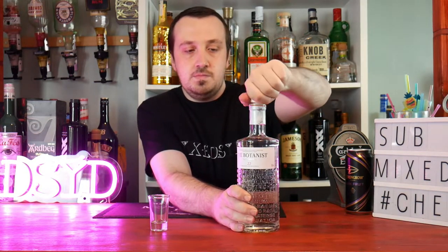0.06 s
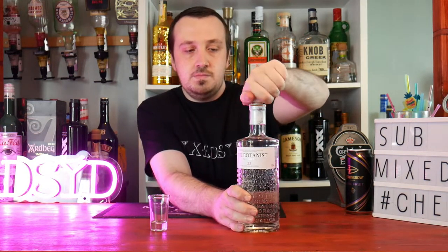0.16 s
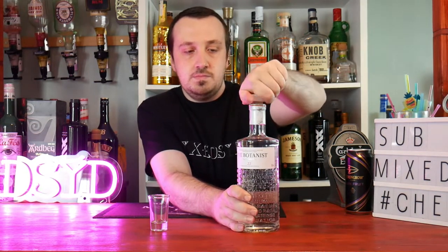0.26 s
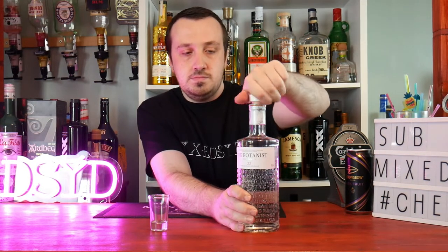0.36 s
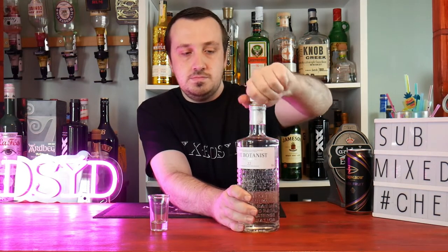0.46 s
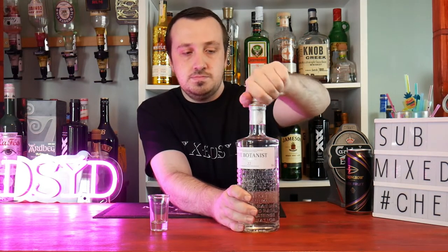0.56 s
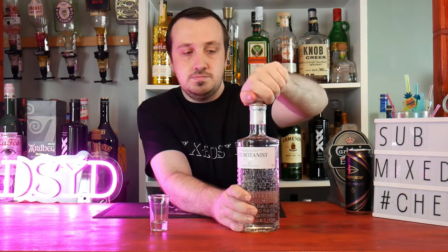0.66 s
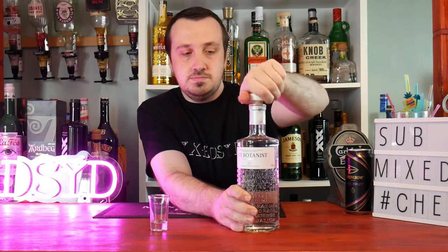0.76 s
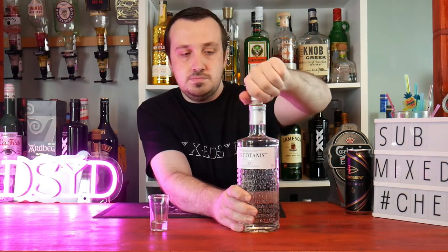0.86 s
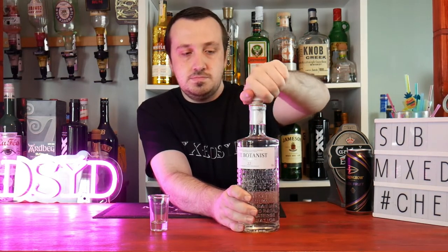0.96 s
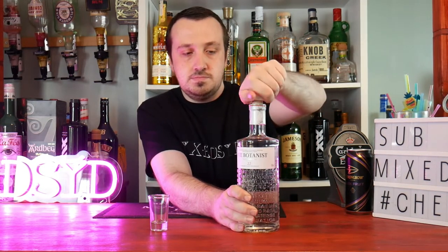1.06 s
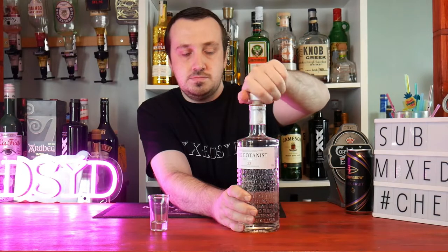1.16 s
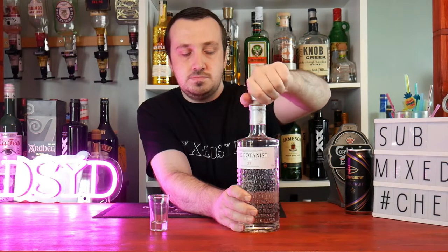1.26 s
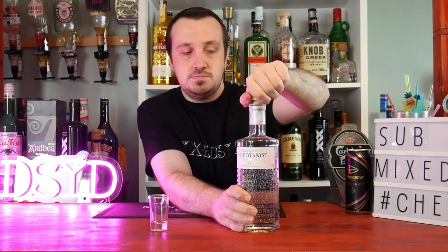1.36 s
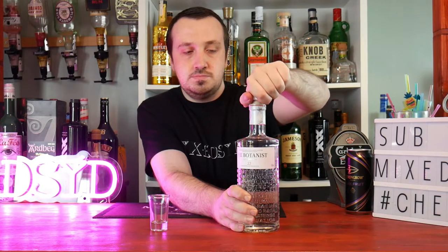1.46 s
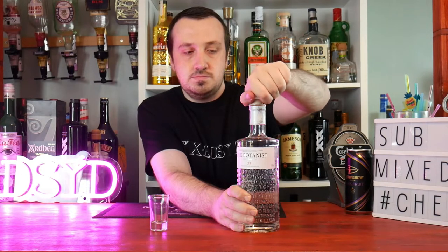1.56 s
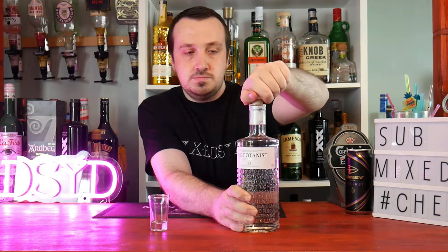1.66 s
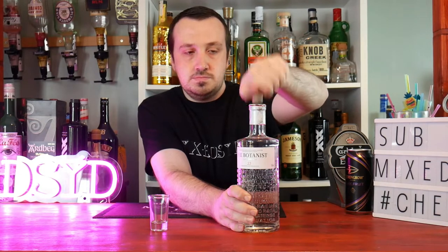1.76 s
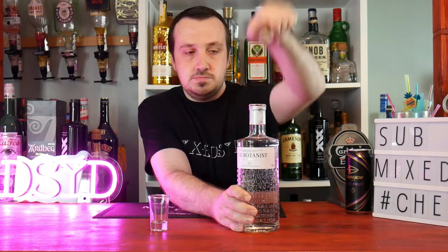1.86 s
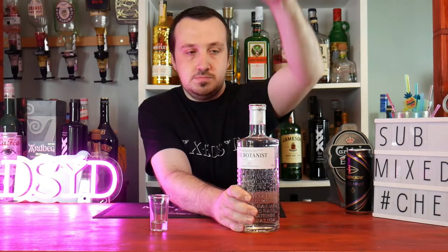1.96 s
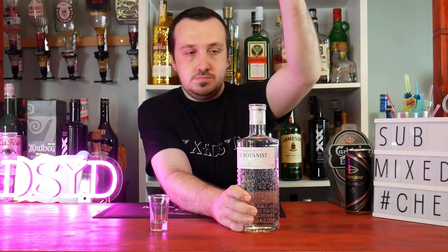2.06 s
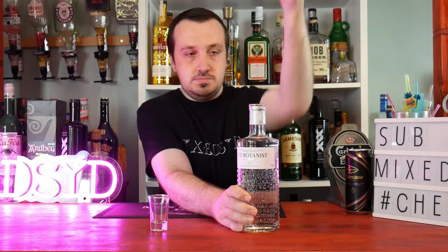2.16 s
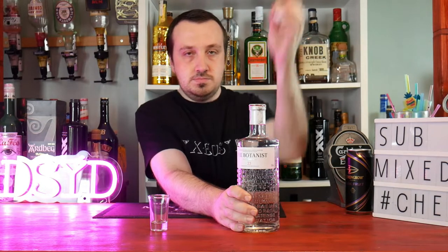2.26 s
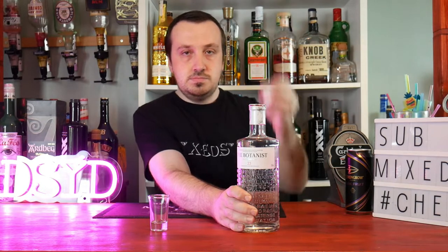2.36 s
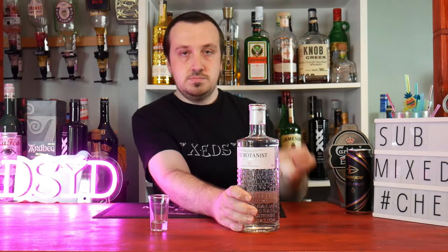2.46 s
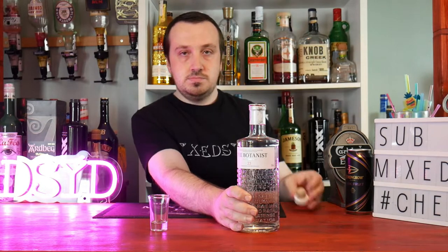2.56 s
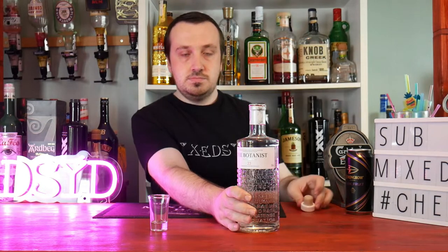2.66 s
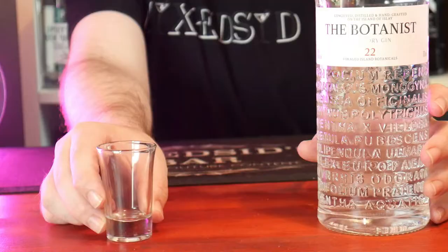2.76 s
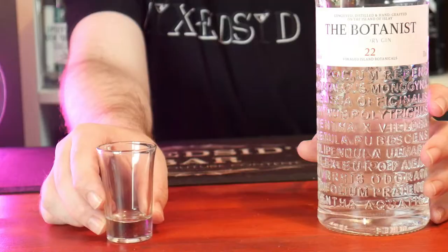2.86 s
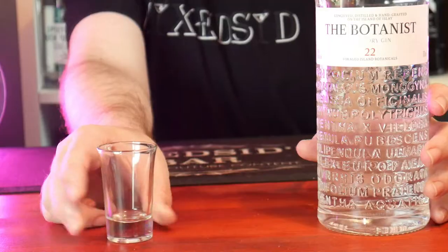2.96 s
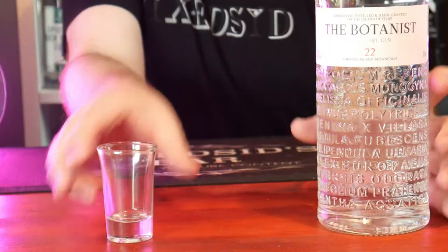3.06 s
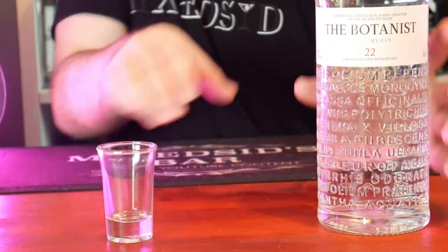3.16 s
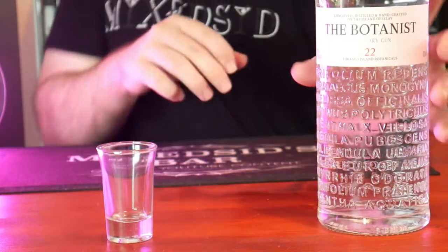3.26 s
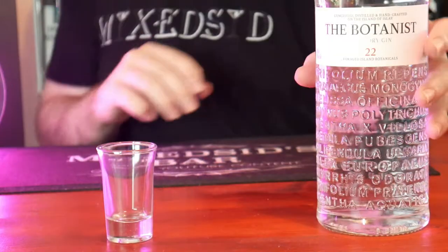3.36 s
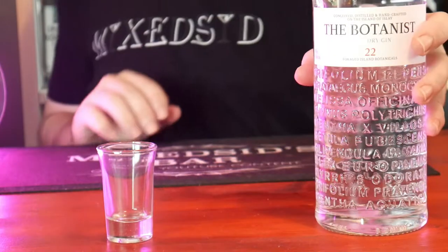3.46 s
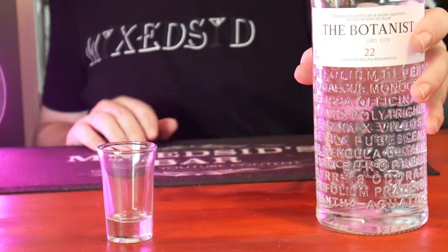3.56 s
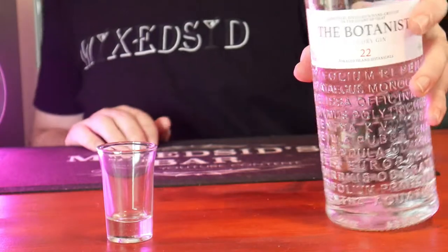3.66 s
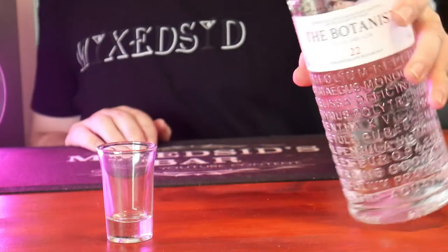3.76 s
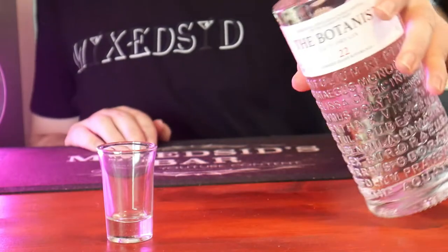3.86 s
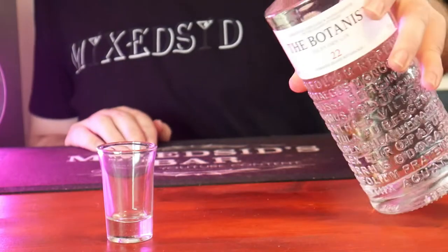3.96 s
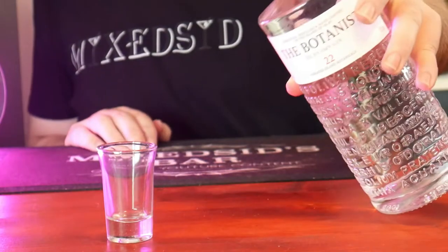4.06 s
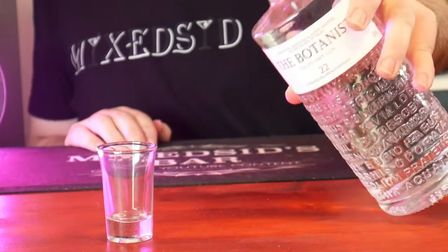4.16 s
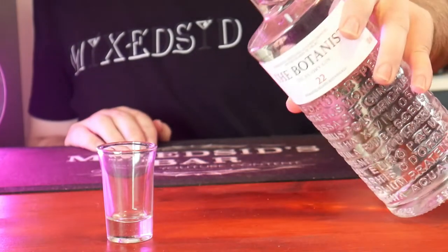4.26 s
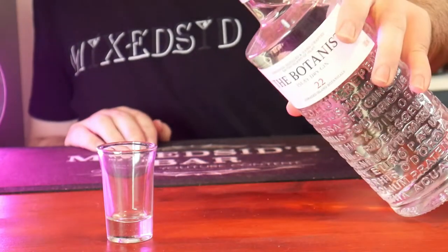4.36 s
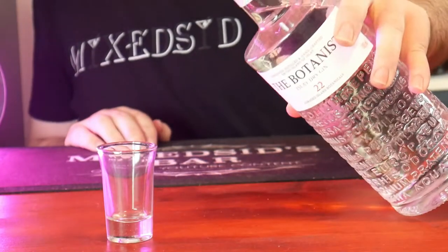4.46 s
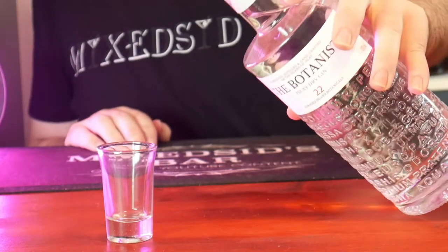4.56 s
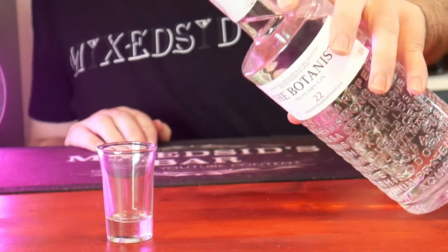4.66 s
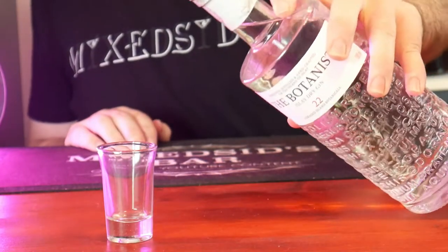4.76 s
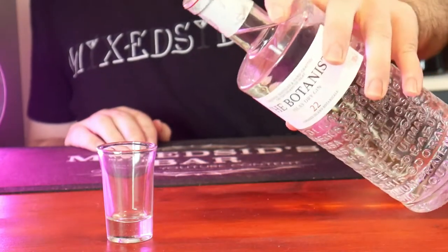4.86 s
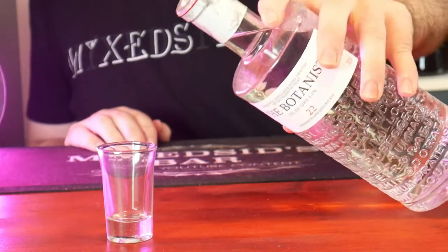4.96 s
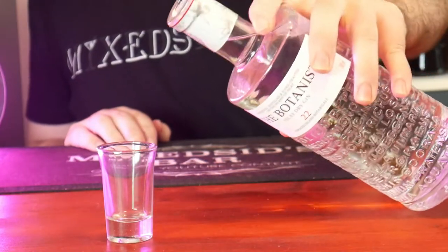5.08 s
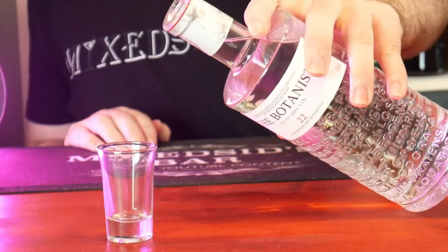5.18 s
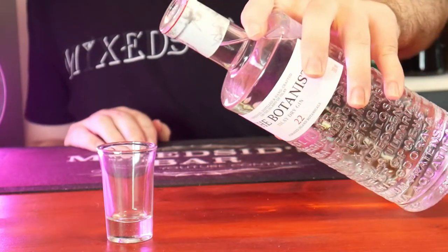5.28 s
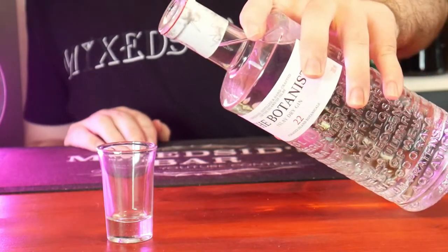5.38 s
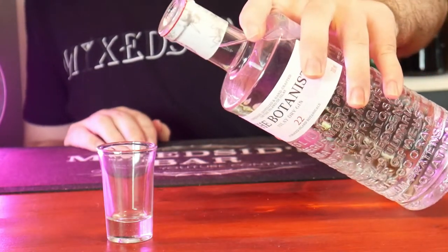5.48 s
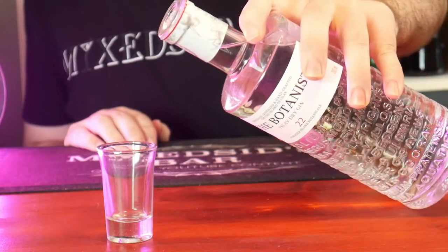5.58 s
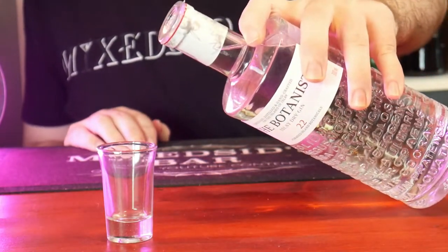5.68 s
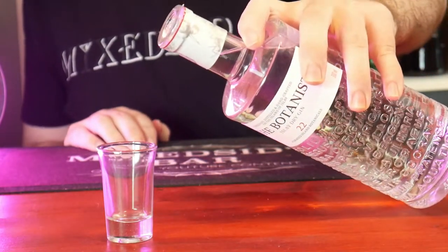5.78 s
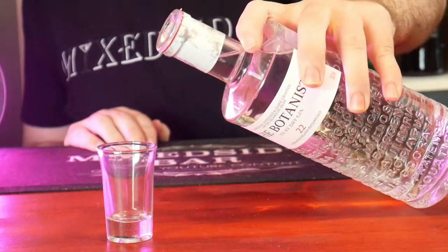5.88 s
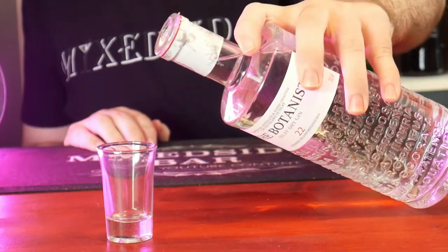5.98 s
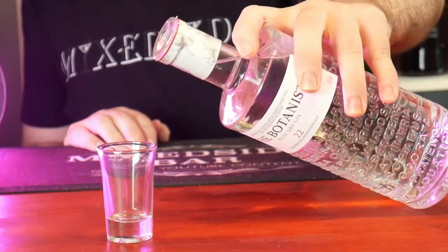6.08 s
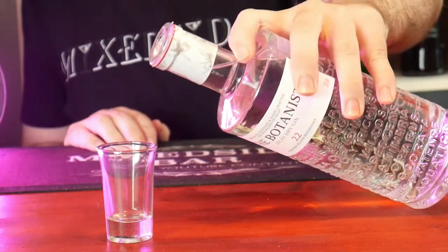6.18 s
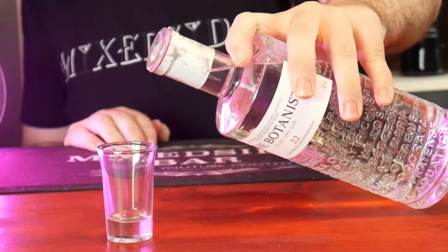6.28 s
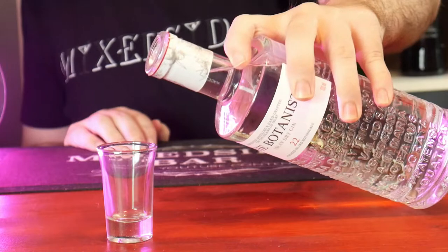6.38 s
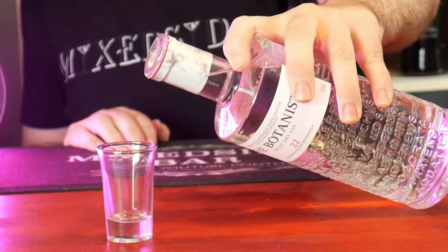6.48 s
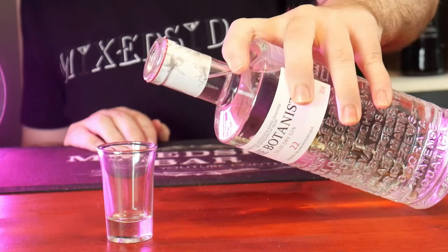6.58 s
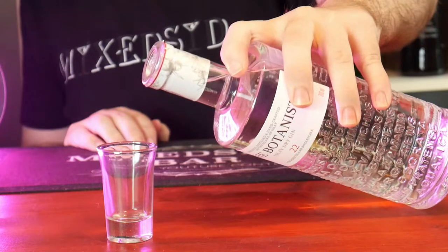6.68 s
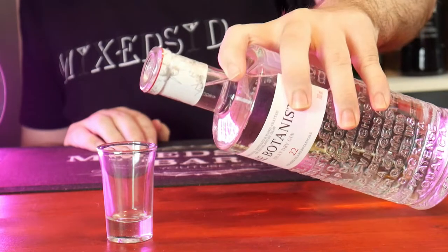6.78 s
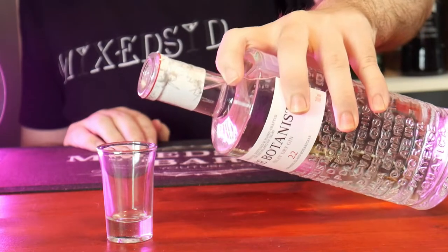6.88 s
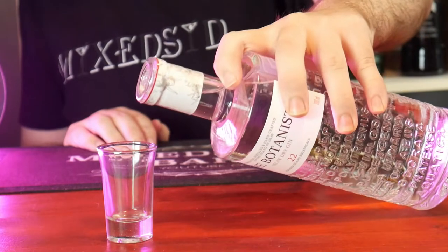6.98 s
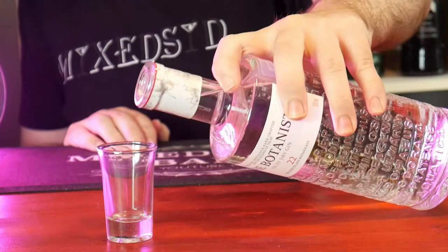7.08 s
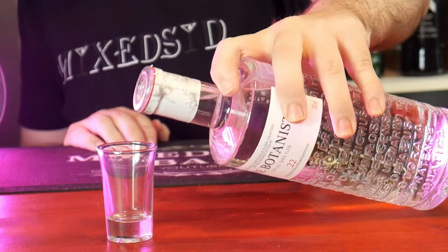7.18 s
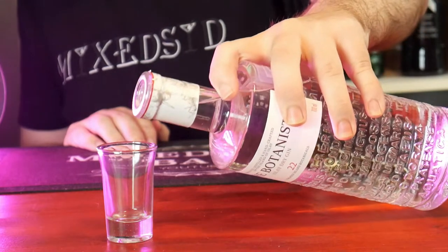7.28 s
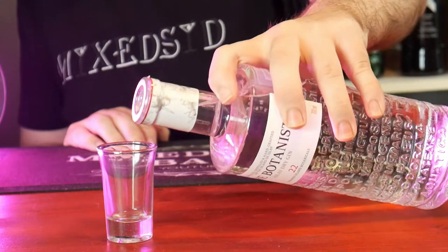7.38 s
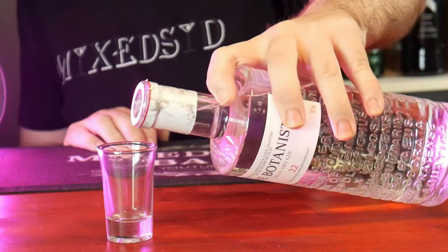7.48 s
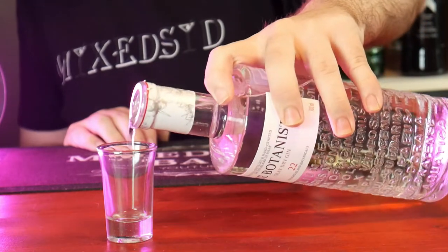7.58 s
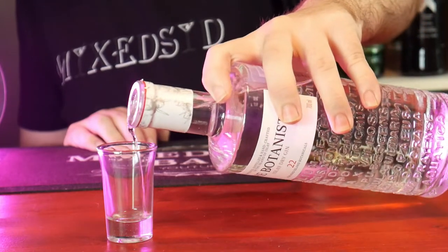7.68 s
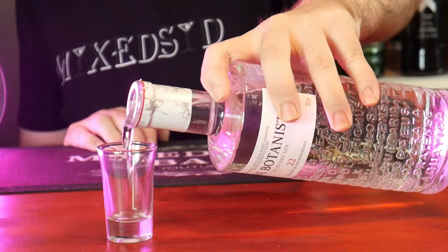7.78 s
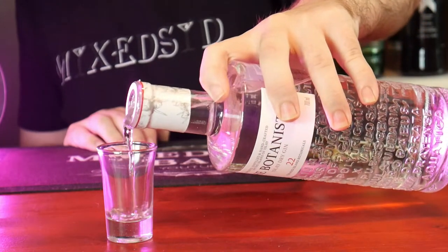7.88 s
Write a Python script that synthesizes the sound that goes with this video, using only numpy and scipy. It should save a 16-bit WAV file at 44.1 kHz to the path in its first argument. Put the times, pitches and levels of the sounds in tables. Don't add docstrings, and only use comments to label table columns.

```python
import sys
import numpy as np
from scipy import signal
from scipy.fft import rfft, irfft, next_fast_len
from scipy.io import wavfile
from scipy.ndimage import map_coordinates

SR = 44100
rng = np.random.default_rng(int(sys.argv[2]) if len(sys.argv) > 2 else 0)


def boost_factor(decibels):
    exponent = np.asarray(decibels, float) / 20
    return 10 ** exponent


def inscribe(sig):
    pcm = np.round(np.clip(np.atleast_2d(sig).T, -1, 1) * 32767)
    wavfile.write(sys.argv[1], SR, pcm.astype(np.int16))


N = 349713

# frequency in Hz, density in dB per Hz.
THUD = [(20, -23.5), (35, -9.5), (52, -3), (64, 1.5), (85, -4.5), (128, -2.5), (160, -12.5), (260, -43.5),
        (600, -100)]
# frequency in Hz, density in dB per Hz.
BODY = [(70, -37.5), (150, -4.5), (215, 2.5), (260, -3), (330, -8.5), (420, -26), (700, -51.5),
        (1500, -100)]
# frequency in Hz, density in dB per Hz.
KNOCK = [(150, -30.5), (350, 2), (600, -1.5), (1200, -7), (1900, -14.5), (2600, -20), (4000, -40)]
# frequency in Hz, density in dB per Hz.
RUSTLE = [(880, -30.5), (1500, -3.5), (1700, 0), (1840, -4.5), (2270, -1), (2810, -2.5), (3770, -0.5),
          (5480, -11.5), (12000, -17), (14800, -19), (15700, -26)]
# time in seconds, level in dB.
EDITS = [
    (0, 0),
    (2.7679, 0),
    (2.7681, -9),
    (2.984, -6),
    (2.986, 0),
]


def pop():
    # frequency in Hz, level in dB, t60 in seconds.
    neck_modes = [(625, -29.5, 0.22), (755, -29.5, 0.28), (808, -31.5, 0.39), (825.5, -33, 0.16)]
    # frequency in Hz, density in dB per Hz.
    rush = [(600, -29.5), (950, -13.5), (1400, -7), (2000, -8), (2420, -2), (2800, -7.5), (3400, 2.5),
            (4200, -12), (5200, -13), (8000, -15.5), (15700, -28)]
    # frequency in Hz, density in dB per Hz.
    scattered = [(250, -28.5), (400, -12.5), (600, -6), (760, 3.5), (845, -3.5), (885, -31), (1300, -62)]
    pop_s = 1.7795
    out = np.zeros(N)
    add(out, pop_s + 0.0005, neck())
    add(out, pop_s + 0.044, ring(neck_modes, attack_s=0.006, wander=0.008))
    add(out, pop_s + 0.008, boost_factor(-25.5) * burst(scattered, 1.1, rise_s=0.012, click=0))
    add(out, pop_s, boost_factor(-30.5) * burst(rush, 1.8, rise_s=0.0018, click=25.0))
    add(out, pop_s, boost_factor(-21.5) * burst(THUD, 0.73, rise_s=0.00416, click=21))
    add(out, pop_s, boost_factor(-25.5) * burst(BODY, 0.94, rise_s=0.003, click=6))
    return out


def neck():
    # start in seconds, hold in seconds, level in dB.
    swells = [
        (.004, .008, -13.5),
        (.0235, .0155, -16.5),
    ]
    open_hz, shut_hz, opening_s = 822, 100, 0.002
    settle_hz, settle_s = 190, 0.01
    t = np.arange(SR // 20) / SR
    gain = sum(boost_factor(db + swell(t, s, hold, attack=1800, release=3600)) for s, hold, db in swells)
    breaking = (open_hz - settle_hz - shut_hz) * np.exp(-t / opening_s)
    settling = settle_hz * np.exp(-t / settle_s)
    return glide(open_hz - breaking - settling, gain)


def cap():
    # frequency in Hz, density in dB per Hz.
    clack = [(40, -48), (130, -11.5), (240, -10), (400, -8.5), (740, -3.5), (1000, -5), (1300, -9),
             (1800, -16), (2300, -12.5), (3200, -22), (4300, -26.5), (5000, -38), (8000, -48.5),
             (15700, -68.5)]
    # frequency in Hz, level in dB, t60 in seconds.
    modes = [(603.5, -9.5, 0.29), (772, 2, 0.42), (870, -1, 0.48), (1016, -4, 0.36), (1248, 6.5, 0.13),
             (1335, 4, 0.098), (2244, -15, 0.55), (2580, -18.5, 0.39), (3122, -8, 0.16), (3800, -23, 0.65)]
    strike_s = 2.6569
    out = np.zeros(N)
    add(out, strike_s, boost_factor(-17.5) * burst(clack, 1.61, rise_s=0.00049, click=16))
    add(out, strike_s, boost_factor(-31.0) * ring(modes, attack_s=0.00032, wander=0.022))
    return out * (np.arange(N) < EDITS[1][0] * SR)


def drag():
    # centre in Hz, width in Hz, level in dB.
    resonances = [(211.4, 25, -2), (240, 30, 0), (520, 80, -29.5)]
    press_db = swell(np.arange(N) / SR, 3.6, 0.044, attack=800, release=236)
    slips = rng.standard_normal(N) * boost_factor(2.5 * wobble(90.3))

    def wood(hz):
        total = 0
        for k, (centre, width, db) in enumerate(resonances):
            damping = 1j * hz * width
            total = total + (-1) ** k * boost_factor(db) * damping / (centre ** 2 - hz ** 2 + damping)
        return total

    locked = glide(213 + 9 * wobble(40), boost_factor(1.1 * wobble(60)))
    hum = boost_factor(1.0) * locked + boost_factor(-5.5) * unit(shaped(slips, wood))
    scrape_db = -50 + 0.82 * press_db
    return boost_factor(-29.5 + press_db) * hum + boost_factor(scrape_db) * noise(KNOCK, slips)


def glugs():
    # time in seconds, click in dB, glass pitch in Hz, gulp in dB, gulp slowness.
    bubbles = [
        (5.67, -63, 1592, -72.5, 1.0),
        (6.385, -50.5, 1660, -65.5, 1.0),
        (6.9316, -46.5, 1800, -65.5, 0.88),
        (7.1441, -45, 1865, -38.5, 1.35),
        (7.3873, -46.5, 1890, -47.5, 1.6),
        (7.5980, -40, 1980, -40.5, 1.05),
        (7.8005, -39.5, 2018, -41, 0.93),
    ]
    # frequency in Hz, density in dB per Hz.
    splash = [(3600, -17), (4250, -3.5), (4450, -9), (4750, -5), (5100, -19), (6000, -35)]
    # delay in seconds, level in dB.
    echoes = [(0.0199, 0), (.027, -12), (.034, -10), (.05, -21), (.063, -18.5), (0.079, -16)]
    gulps, snaps = np.zeros(N), np.zeros(N)
    for s, db, hz, gulp_db, slowness in bubbles:
        add(gulps, s - 0.13 * slowness, boost_factor(gulp_db) * gulp(slowness))
        room_mode = [(240, -12 + 6 * np.log2(slowness), 0.32)]
        add(gulps, s, boost_factor(gulp_db) * ring(room_mode, attack_s=0.0054, wander=0.004))
        gulp_echo = ring([(189, -3, 0.063)], attack_s=0.0082, wander=0.004)
        add(gulps, s + 0.0146, boost_factor(gulp_db) * gulp_echo)

        glass = [(hz, -6, 0.07), (0.96 * hz, -14, 0.1), (1.1 * hz, -22, 0.06), (4470, -20, 0.08)]
        add(snaps, s, boost_factor(db) * ring(glass, attack_s=0.00026, wander=0.024))
        scattered = [(0.85 * hz, -40), (0.975 * hz, -5), (hz, 0), (1.025 * hz, -5), (1.26 * hz, -40)]
        add(gulps, s + 0.013, boost_factor(db - 17.5) * burst(scattered, 1.55, rise_s=0.0114, click=0))

        add(gulps, s, boost_factor(db - 19) * burst(splash, 1.0, rise_s=0.00037, click=2.5))
        slap = [(200, 19.0), (2000, 5.0), (5000, -1.0), (15000, -22)]
        add(gulps, s, -boost_factor(db - 8) * burst(slap, 0.56, rise_s=0.0033, click=25))
    return gulps + walls(snaps, echoes, db=-6)


def gulp(slowness):
    t = np.arange(-0.13 * slowness, 0, 1 / SR) / slowness
    wide_share, narrowing_s = 0.2253, 0.024
    share = wide_share + (1 - wide_share) * np.exp(t / narrowing_s)
    louder_db = 34 * np.log10(share / 0.75)
    db = louder_db + swell(t, -0.0092, 0, attack=80, release=1180)
    end_hz = 247.6 * slowness ** 0.33
    return glide(share * end_hz, boost_factor(db))


def thumps():
    # time in seconds, boom in dB, body in dB over it, knock in dB over it.
    blows = [(0.019, -47.5, -9, -10), (0.13, -38, -7, -27.5), (0.276, -24.5, 0, -12),
             (0.377, -46.5, -12, -1.5), (0.557, -37.5, -5.5, -14.5), (0.631, -41, -6.5, -5.5),
             (0.726, -31, -2, -9), (0.788, -36.5, -33, -10), (0.956, -37.5, -10, -23.5),
             (1.161, -48.5, -19, -5.5), (1.361, -56.5, -16, -11), (1.418, -49.5, -3, -8),
             (1.479, -47, -15, -22.5), (2.609, -40, -17, -17), (3.029, -51, -10, -9),
             (3.125, -54.5, -18, 8.5), (3.239, -68, -12, -1.5), (3.354, -30.5, -5.5, -15.5),
             (3.583, -28.5, -16, -34.5), (4.297, -18.5, -3, -19.5), (4.579, -46, -6.5, -17),
             (4.742, -38, -16, -33), (5.205, -26, 0, -20.5), (6.073, -32.5, -8, -27), (6.9, -59, 1.5, -13)]
    out = np.zeros(N)
    for s, db, body_db, knock_db in blows:
        scale = np.clip(1.5 + 0.15 * (db + 38), 0.5, 1)
        lows = bursts([THUD, BODY], 0.94 * scale, rise_s=0.00566, click=17.8)
        add(out, s + 0.0012, boost_factor(db - 1.0 + np.array([0, body_db])) @ lows)
        knock = burst(KNOCK, scale, rise_s=0.0013, click=12.14)
        add(out, s + 0.001, boost_factor(db + knock_db - 3.0) * knock)
        brush_db = -66.5 + 0.89 * (db + knock_db + 49.5)
        add(out, s, boost_factor(brush_db) * burst(RUSTLE, 1.7 * scale, rise_s=0.0065, click=0.8))
    return out


def taps():
    # time in seconds, peak in dB, pitch in Hz, decay scale.
    touches = [(.279, -34, 387, 0.73), (1.779, -23.5, 137, 0.45), (4.33, -64.5, 8900, 1.6),
               (6.385, -62.5, 424, 0.33), (.378, -44.5, 592, 0.64), (.79, -53, 795, 0.57),
               (1.162, -50.5, 520, 1.24), (1.42, -56.5, 416, 0.86), (2.77, -54.5, 650, 1.0),
               (2.795, -52.5, 465, 1.47), (2.86, -55, 240, 1.6), (2.66, -46, 3900, 1.5),
               (1.7795, -26.5, 240, .22), (3.112, -48.5, 328, 0.79), (3.245, -70, 640, 0.19),
               (4.299, -54.5, 1720, 1.5), (5.21, -61, 3500, 0.55), (5.23, -54.5, 910, .9),
               (3.36, -51, 600, 1.1), (4.302, -43.5, 620, 0.7), (6.906, -57, 327, 0.51)]
    out = np.zeros(N)
    for s, db, hz, scale in touches:
        hollow = [(0.6 * hz, -30), (0.82 * hz, -4), (hz, 0), (1.123 * hz, -5), (1.75 * hz, -32), (4 * hz, -70)]
        add(out, s, boost_factor(db) * burst(hollow, scale, rise_s=0.0022, click=6.5))
    return out


def crackles():
    # time in seconds, peak in dB.
    ticks = [
        (0.1471, -54.5),
        (0.5807, -52),
        (0.631, -52.5),
        (0.7267, -54),
        (1.3638, -54),
        (2.8514, -61),
        (3.1242, -42.5),
        (6.0736, -62),
    ]
    out = np.zeros(N)
    for s, db in ticks:
        add(out, s, boost_factor(db - 7.5) * burst(RUSTLE, 0.41, rise_s=0.0026, click=3))
    return out


def movement():
    # time in seconds, boom in dB.
    weight = [(0.0, -48), (0.84, -50.5), (1.06, -53), (1.54, -63), (1.92, -47.5), (2.39, -65.5),
              (3.27, -60), (3.58, -57), (3.8, -65), (4.26, -66.5), (4.48, -53), (5.1, -69), (5.34, -63.5),
              (5.9, -70.5), (6.32, -60.5), (6.63, -64.5), (6.89, -61.5), (7.93, -64)]
    # frequency in Hz, density in dB per Hz.
    floor = [(25, -18.5), (45, -1), (62, 3), (85, -10), (110, -9.5), (200, -53)]
    # frequency in Hz, density in dB per Hz.
    boards = [(60, -42.5), (120, 2), (170, 0.5), (230, -3), (400, -12.5), (900, -44.5)]
    # start in seconds, hold in seconds, rustle in dB, rub in dB over it.
    strokes = [(0.0, 0.13, -63.5, 4.5), (0.282, .05, -65, 12), (.585, .03, -65, 6.5),
               (0.747, 0.015, -64, 16), (0.809, 0.19, -72, 1), (1.166, 0.025, -76, 16),
               (1.37, .01, -66.5, 7.5), (1.658, .05, -73, 0), (1.947, 0.09, -68, 8.5), (2.086, 0.1, -60, 0),
               (2.459, .08, -64, -14.5), (2.631, .03, -55, 1.5), (2.986, 0.086, -61, -5.5),
               (2.333, .05, -68.5, -9), (3.129, 0.064, -57, 0), (3.275, .13, -58.5, -2.5),
               (3.542, 0.022, -64.5, 0.5), (3.588, 0.0257, -57.5, 6), (3.723, 0.056, -95, -18),
               (4.306, 0.036, -61.5, -0.5), (.42, 0.092, -71, 2)]
    boom_db, = curves(weight)
    creak_db = -69.5 + 0.5 * (boom_db + 60.5)
    low = boost_factor(boom_db + 2.5 * wobble(11.0)) * noise(floor)
    low = low + boost_factor(creak_db + 0.83 * wobble(17)) * noise(boards)

    t = np.arange(0, N, 32) / SR
    levels = np.array([boost_factor(db + swell(t, s, hold, attack=344, release=96)) for s, hold, db, _ in strokes])
    rub_gains = boost_factor([row[-1] for row in strokes])
    rustle, rub = curves(np.transpose([t, levels.sum(0), rub_gains @ levels]))

    seal = lambda hz: 1 / (1 + ((hz - 3880) / 200) ** 4)
    squeak = unit(shaped(rng.standard_normal(N), seal))
    brushing = noise(RUSTLE) + boost_factor(-11.5 + 2.5 * wobble(5.5)) * squeak
    grain = boost_factor(1.5 * wobble(70))
    return low + grain * boost_factor(-6.5) * (rustle * brushing + rub * noise(KNOCK))


def hush():
    # frequency in Hz, density in dB per Hz.
    tone = [(180, -33.5), (300, -3), (527, -5), (642, -3), (721, -4.5), (956, -4.5), (1420, -6),
            (1600, -10), (1880, -10.5), (2150, -11.5), (15700, -15)]
    # frequency in Hz, likeness from 0 to 1.
    alike = [(60, 0.872), (500, 0.85), (2000, 0.83), (5000, 0.31), (12000, 0.32)]

    def spread(hz):
        turn = np.arccos(np.clip(along(alike, hz), 0, 1)) / 2
        return np.array([np.cos(turn), np.sin(turn)])

    mid, side = shaped(np.array([noise(tone), noise(tone)]), spread)
    return boost_factor(-70 + 0.13 * wobble(1.167)) * np.array([mid + side, mid - side])


def burst(spectrum, scale, rise_s, click):
    return bursts([spectrum], scale, rise_s, click)[0]


def bursts(spectra, scale, rise_s, click):
    # frequency in Hz, t60 in seconds.
    decay = [(60, 0.51), (150, 0.3), (400, 0.32), (1200, 0.19), (4000, 0.16), (12000, 0.11)]
    hz, t60 = np.transpose(decay)
    t = np.arange(next_fast_len(round(SR * np.clip(scale * 0.45, 0.1, 0.5)))) / SR
    scatter = rng.standard_normal(len(t)) * (1 - np.exp(-t / rise_s))
    scatter[0] = click
    log_bins = np.log(np.fft.rfftfreq(len(t), 1 / SR) + 1)
    place = np.interp(log_bins, np.log(hz), np.arange(len(hz)))
    share = np.clip(1 - abs(place - np.arange(len(hz))[:, None]), 0, 1)
    fading = scatter * boost_factor(-60 * t / (scale * t60[:, None]))
    dying = irfft((rfft(fading) * share).sum(0), len(t))
    parts = np.array([coloured(dying, spectrum) for spectrum in spectra])
    early_rms = np.sqrt(np.mean(parts[:, :SR // 40] ** 2, axis=1))
    return parts / early_rms[:, None] / 2


def ring(modes, attack_s, wander):
    t = np.arange(SR // 2) / SR
    out = np.zeros(len(t))
    for hz, db, t60 in modes:
        drift = np.cumsum(rng.standard_normal(len(t))) * wander
        out += boost_factor(db - 60 * t / t60) * np.sin(2 * np.pi * hz * t + drift)
    return out * (1 - np.exp(-t / attack_s))


def glide(hz, gain):
    return gain * np.sin(2 * np.pi * np.cumsum(hz) / SR)


def swell(t, start, hold, attack, release):
    return -attack * np.clip(start - t, 0, None) - release * np.clip(t - start - hold, 0, None)


def walls(x, echoes, db):
    out = x.copy()
    for s, echo_db in echoes:
        add(out, s, boost_factor(db + echo_db) * x)
    return out


def add(track, s, x):
    i = round(s * SR)
    track[i:i + len(x)] += x[:len(track) - i]


def unit(x):
    return x / np.sqrt(np.mean(x ** 2) + 1e-20)


def along(points, hz):
    f, v = np.transpose(points)
    return np.interp(np.log(hz + 1), np.log(f + 1), v)


def curves(rows):
    s, *cols = np.transpose(rows)
    return [np.interp(np.arange(N) / SR, s, c) for c in cols]


def wobble(rate):
    t = np.arange(0, N + 32, 32) / SR
    knots = rng.standard_normal(int(N * rate / SR) + 4)
    return np.interp(np.arange(N) / SR, t, map_coordinates(knots, [t * rate]))


def shaped(x, response):
    m = next_fast_len(N)
    return irfft(rfft(x, m) * response(np.fft.rfftfreq(m, 1 / SR)), m)[..., :N]


def noise(spectrum, source=None):
    if source is None:
        source = rng.standard_normal(N)
    return unit(shaped(source, lambda hz: boost_factor(along(spectrum, hz))))


def coloured(x, spectrum):
    m = 2 * next_fast_len(x.shape[-1] // 2 + 4096)
    gain = boost_factor(along(spectrum, np.fft.rfftfreq(m, 1 / SR)))
    cep = irfft(np.log(gain + 1e-6), m)
    cep[1:m // 2] *= 2
    cep[m // 2 + 1:] = 0
    return irfft(rfft(x, m) * np.exp(rfft(cep)), m)[..., :x.shape[-1]]


def scene():
    near = pop() + cap() + drag() + glugs() + thumps() + taps() + crackles()
    near = near + movement() * boost_factor(curves(EDITS)[0])
    spread = [(60, -49.5), (300, -48), (600, -51), (1200, -29), (4000, -17), (15000, -7.5)]  # (Hz, dB)
    side = coloured(np.roll(near, 40), spread)
    return near + np.array([side, -side]) + hush()


def band_limit(x):
    return signal.sosfilt(signal.butter(12, 15820, fs=SR, output="sos"), x)


def record(dry):
    mic = shaped(dry, lambda hz: (1j * hz / (22 + 1j * hz)) ** 2 * (hz < 15800))
    return band_limit(mic)


dry = scene()
out = record(dry)
inscribe(out)
```